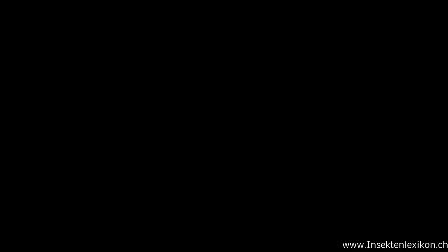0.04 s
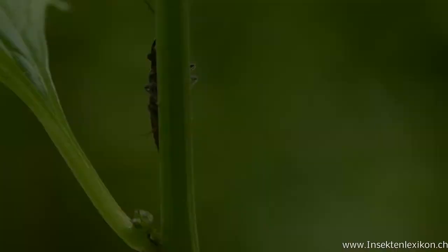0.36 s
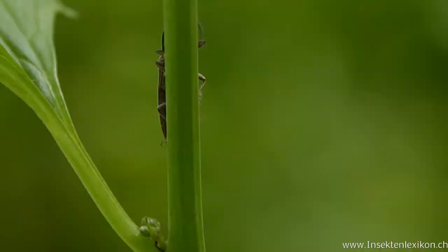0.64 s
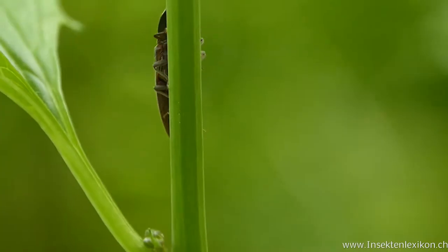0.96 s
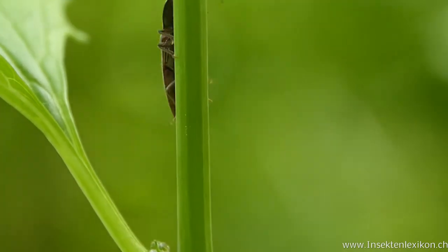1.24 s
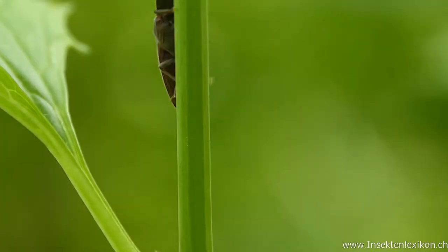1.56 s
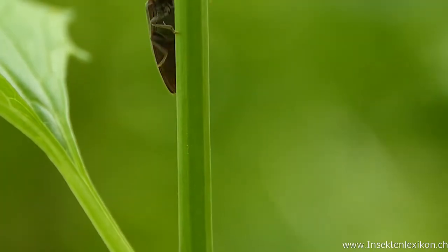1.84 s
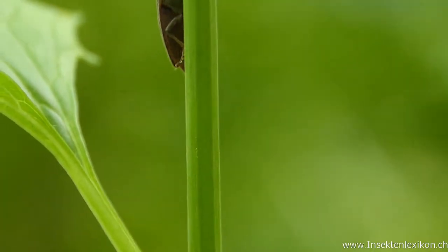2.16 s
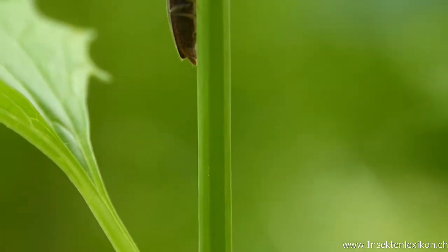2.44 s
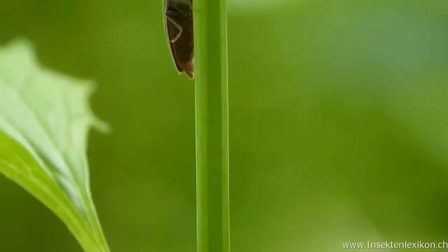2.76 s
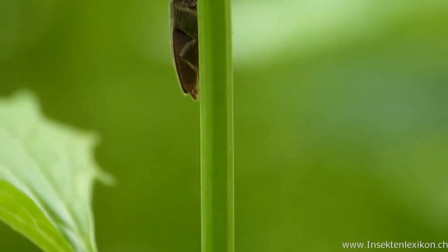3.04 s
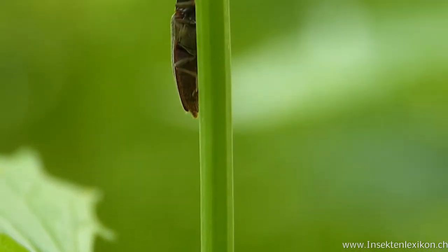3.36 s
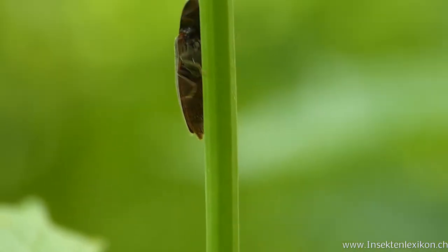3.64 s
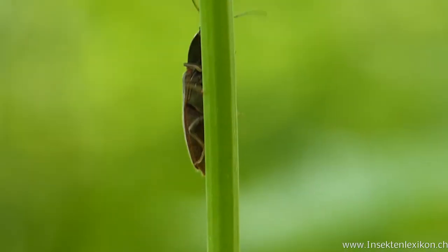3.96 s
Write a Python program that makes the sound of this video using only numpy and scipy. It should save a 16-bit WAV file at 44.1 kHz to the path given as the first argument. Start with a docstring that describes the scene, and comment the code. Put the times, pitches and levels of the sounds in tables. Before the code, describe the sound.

Birdsong fades in at a wood's edge: quick gliding whistles close on the left, mixed with more distant whistles, short high chips and a few buzzy calls. The notes ring briefly among the trees above faint, steady background noise.

```python
"""Songbirds overlap at a wood's edge: a near warbler on the left, a low fluting bird and a thin piping
one further off, sharp falling chips, a few buzzy calls and a faint far chorus. Each note is one
gliding sine; trunks and leaves smear it into a tail. Two small ticks of band-passed noise sound
close by, over a distant rumble and soft hiss. The whole scene fades in."""
import sys
import numpy as np
from scipy import signal
from scipy.fft import rfft, irfft
from scipy.io import wavfile
from scipy.ndimage import uniform_filter1d

SR = 44100
rng = np.random.default_rng(int(sys.argv[2]) if len(sys.argv) > 2 else 0)


def store_pcm(level_fs):
    """Save levels as 16-bit WAV."""
    pcm = np.round(np.clip(level_fs, -1, 1) * 32767).astype(np.int16)
    wavfile.write(sys.argv[1], SR, np.atleast_2d(pcm).T)


N = 176400
T = np.arange(N) / SR
BIN_HZ = np.arange(N // 2 + 1) * SR / N + 1  # +1 Hz avoids zero
WOOD_T60_S = 0.45


def undb(db):
    """Decibels to gain."""
    return 10 ** (np.asarray(db) / 20)


def pan(db):
    """Constant-power gains for a left-minus-right level."""
    gains = undb(np.array([[db], [-db]]) / 2)
    return gains / np.sqrt(np.mean(gains ** 2))


def walk(rate_hz, size):
    """Smooth random wander, spread near 1."""
    hold = max(int(SR / rate_hz), 1)
    steps = np.repeat(rng.standard_normal(N // hold + 2), hold)[:size + hold]
    return uniform_filter1d(steps, hold)[hold:]


def colour(points):
    """Gain per frequency bin from (Hz, dB) points."""
    hz, db = np.array(points, float).T
    return undb(np.interp(np.log(BIN_HZ), np.log(hz), db))


def echo(x, t60_s, build_s=0.006, width=0.43):
    """Dense scatter from trunks and leaves, strongest from ahead."""
    envelope = (1 - np.exp(-T / build_s)) * 1000 ** (-T / t60_s)
    envelope /= np.sqrt(np.sum(envelope ** 2) * (1 + width ** 2))
    mid, side = rng.standard_normal((2, N)) * envelope
    response = np.array([mid + width * side, mid - width * side])
    return signal.fftconvolve(x[None], response, axes=1)[:, :N]


def wood(x, pan_db, echo_db, t60_s):
    """Panned direct sound plus its echo, which sits nearer the centre."""
    return x * pan(pan_db) + undb(echo_db) * echo(x, t60_s) * pan(0.23 * pan_db)


def add_note(out, start_s, hz, db, waver, attack_s, release_s=.0064, flutter_db=2.8):
    """Add a sine along a pitch curve; pitch wavers by a fraction, level flutters."""
    n = len(hz)
    t = T[:n]
    rise = np.sin(np.pi / 2 * np.clip(t / attack_s, 0, 1))
    fall = np.sin(np.pi / 2 * np.clip((t[-1] - t) / release_s, 0, 1))
    phase = 2 * np.pi * np.cumsum(hz * (1 + waver * walk(300, n))) / SR
    gain = undb(db + flutter_db * walk(100, n))
    note = np.sqrt(2) * np.sin(phase) * rise * fall * gain
    i = int(start_s * SR)
    out[i:i + n] += note[:N - i]


def whistles(notes, waver, buzz_depth=0, buzz_hz=170, swell_share=0, min_attack_s=.011):
    """Notes that each arc through three pitches; a buzz shakes the pitch quickly."""
    out = np.zeros(N)
    for start_s, length_s, first_hz, middle_hz, last_hz, db in notes:
        t = np.arange(-min_attack_s / 2, length_s, 1 / SR)
        parabola = np.polyfit([0, .5, 1], [first_hz, middle_hz, last_hz], 2)
        arc_hz = np.polyval(parabola, t / length_s)
        buzz = 1 + buzz_depth * np.sin(2 * np.pi * buzz_hz * t)
        attack_s = max(min_attack_s, swell_share * length_s)
        add_note(out, max(start_s + t[0], 0), arc_hz * buzz, db, waver, attack_s)
    return out


def air(level_db=-51, wander_db=.6):
    """Distant rumble and soft hiss: wide, nearly steady, leaning left."""
    # Noise spectra. Each row: frequency in Hz, relative density in dB.
    mid_spectrum = [(25, -88), (50, -87), (80, -80.5), (115, -68), (165, -68), (250, -72.5), (380, -77.5),
                    (650, -75), (1000, -72.5), (1250, -75.5), (1600, -81), (2800, -79.5), (5000, -83.5),
                    (7500, -85), (10000, -94.5), (13000, -106), (15500, -111)]
    side_spectrum = [(25, -96), (60, -84), (110, -88), (170, -82), (250, -72.5), (380, -74), (650, -75),
                     (1000, -74.5), (1600, -83), (4000, -90.5), (6000, -94), (8000, -91), (10000, -99),
                     (12500, -112), (15500, -120)]
    # Balance. Each row: frequency in Hz, left minus right in dB.
    balance = [(90, 0), (150, 6), (270, 3.5), (550, -2.5), (1100, 2), (3000, -0.5), (7000, 1),
               (15000, -0.5)]
    mid = rfft(rng.standard_normal(N)) * colour(mid_spectrum)
    side = rfft(rng.standard_normal(N)) * colour(side_spectrum)
    lean = np.sqrt(colour(balance))
    stereo = irfft(np.array([(mid + side) * lean, (mid - side) / lean]), N)
    return stereo / stereo.std() * undb(level_db + wander_db * walk(5.25, N))


def chorus(count=56, low_hz=2019, high_hz=5420, length_s=0.052, max_bend=0.1237, db=-62):
    """Faint random notes of far birds, heard only as echo."""
    notes = []
    for slot, (offset, pitch, glide) in enumerate(rng.random((count, 3))):
        start_s = (slot + offset) / count * T[-1]
        hz = low_hz * (high_hz / low_hz) ** pitch
        bend = max_bend * (2 * glide - 1)
        notes.append((start_s, length_s, hz * (1 + bend), hz, hz * (1 - bend), db))
    return echo(whistles(notes, waver=.032), WOOD_T60_S) * pan(db=13)


def ticks(rise_s=0.01, top_hz=10500):
    """Brief close cracks of resonant noise that echo among the trees."""
    # Each row: peak time in s, level in dB, centre and width in Hz, decay in s, echo in dB.
    cracks = [(0.542, -41.5, 4160, 3850, 0.0067, -1.5), (1.618, -49, 5900, 1390, 0.004, -6)]
    lowpass = 1 / (1 + (BIN_HZ / top_hz) ** 10)
    out = np.zeros((2, N))
    for peak_s, db, hz, width_hz, decay_s, echo_db in cracks:
        resonance = 1 / (1 + 1j * (BIN_HZ / hz - hz / BIN_HZ) * hz / width_hz)
        noise = irfft(rfft(rng.standard_normal(N)) * resonance * lowpass, N)
        envelope = np.exp(-np.maximum((peak_s - T) / rise_s, (T - peak_s) / decay_s))
        crack = noise / noise.std() * envelope * undb(db)
        out += wood(crack, pan_db=9.5, echo_db=echo_db, t60_s=WOOD_T60_S)
    return out


def buzzes():
    """Swelling calls roughened by fast vibrato, the first a high down-slur."""
    # Each row: start and length in s, first, middle and last pitch in Hz, level in dB.
    notes = [(.685, 0.18, 9300, 7260, 5080, -60.5), (1.278, .06, 5160, 5050, 5160, -55.5),
             (2.735, 0.068, 4600, 4510, 4270, -55.5), (3.04, 0.038, 5680, 5430, 5130, -56.5),
             (3.605, 0.048, 5900, 5450, 5190, -56.5)]
    calls = whistles(notes, waver=.032, buzz_depth=.032, swell_share=.55)
    return wood(calls, pan_db=1, echo_db=0.87, t60_s=1)


def chips():
    """Sharp calls near the centre; each plunges in pitch and levels out."""
    # Each row: start and length in s, top and settling pitch in Hz, fall constant in s, level in dB.
    notes = [(0.71, 0.012, 5380, 4600, 0.0076, -48), (2.04, 0.036, 5750, 3360, 0.021, -56),
             (2.308, 0.021, 5770, 4450, .013, -57.5), (2.356, 0.079, 5950, 3950, 0.0086, -53.5),
             (2.386, 0.022, 5600, 4490, 0.0155, -53), (2.69, 0.015, 5790, 4460, 0.0061, -48.5),
             (3.023, 0.019, 6160, 4440, 0.0112, -49), (3.034, 0.046, 5960, 3410, 0.019, -54.5),
             (3.374, 0.036, 5800, 3905, 0.0068, -52), (3.691, 0.025, 6160, 4540, .006, -52)]
    calls = np.zeros(N)
    for start_s, length_s, top_hz, settle_hz, fall_s, db in notes:
        t = T[:int(length_s * SR)]
        hz = settle_hz + (top_hz - settle_hz) * np.exp(-t / fall_s)
        add_note(calls, start_s, hz, db, waver=.016, attack_s=.008)
    return wood(calls, pan_db=1, echo_db=2.5, t60_s=0.89)


def piper():
    """Thin, high, fairly level whistles from further off."""
    # Each row: start and length in s, first, middle and last pitch in Hz, level in dB.
    notes = [(.33, .06, 4890, 4960, 5130, -55.5), (.645, 0.073, 3900, 4110, 4150, -59.5),
             (1.304, 0.12, 4090, 4060, 3980, -53.5), (1.505, 0.062, 4880, 4450, 4170, -50.5),
             (1.548, 0.078, 4190, 4182, 4150, -48), (1.645, .07, 4180, 4080, 4180, -61.5),
             (3.43, 0.063, 4080, 4010, 3745, -56), (3.507, 0.0582, 4100, 3920, 3720, -50.5),
             (3.737, 0.047, 4560, 4480, 4500, -54.5), (3.82, 0.12, 4600, 4720, 4950, -60)]
    return wood(whistles(notes, waver=.008), pan_db=10.5, echo_db=0.86, t60_s=0.81)


def fluter():
    """Low slurred whistles from further off, more echo than direct sound."""
    # Each row: start and length in s, first, middle and last pitch in Hz, level in dB.
    notes = [(1.375, 0.16, 2610, 2156, 1660, -59.5), (1.538, 0.12, 2370, 2122, 1975, -56.5),
             (1.772, 0.029, 1837, 2200, 2400, -53.5), (1.81, 0.14, 1717, 1845, 1945, -59),
             (2.008, 0.027, 2670, 2285, 2030, -55), (2.07, .04, 2152, 2100, 1920, -55.5),
             (2.22, 0.081, 2170, 2270, 2300, -58), (2.322, 0.056, 2303, 2330, 2556, -50),
             (2.66, 0.059, 2026, 1928, 1620, -60), (2.94, 0.053, 2704, 2330, 1820, -61),
             (2.995, 0.18, 1933, 1958, 1900, -56.5), (3.85, 0.049, 2390, 2480, 2620, -58),
             (3.908, 0.072, 2980, 2580, 2280, -62.5)]
    return wood(whistles(notes, waver=.016), pan_db=13, echo_db=1.7, t60_s=0.93)


def warbler():
    """Quick gliding whistles near on the left, more direct sound than echo."""
    # Each row: start and length in s, first, middle and last pitch in Hz, level in dB.
    notes = [(.122, 0.067, 3400, 3330, 3800, -50), (.4, .05, 4200, 3270, 2600, -56),
             (.718, 0.019, 2495, 2870, 3180, -64), (.825, 0.11, 2422, 2770, 2863, -56),
             (.88, 0.041, 2750, 2860, 2980, -50), (.945, 0.035, 3200, 3630, 3800, -50.5),
             (1.003, 0.028, 3810, 3560, 3060, -47), (1.125, 0.033, 3235, 2950, 3040, -53.5),
             (1.168, 0.039, 3470, 3030, 2830, -53), (1.178, 0.049, 3165, 3280, 3000, -51.5),
             (1.31, 0.043, 2510, 2750, 3200, -54), (1.33, 0.031, 3176, 3370, 3540, -49.5),
             (1.388, 0.032, 3065, 3400, 3630, -46), (1.42, 0.098, 3790, 3700, 3720, -51),
             (1.735, 0.15, 2680, 2850, 2550, -53), (1.824, 0.051, 3360, 3100, 2860, -49.5),
             (1.985, 0.066, 2700, 2690, 2640, -54.5), (2.045, 0.064, 3130, 3040, 2850, -49.5),
             (2.177, .06, 3370, 3250, 3170, -45.5), (2.25, 0.062, 3230, 3210, 3170, -51),
             (2.396, 0.02, 2850, 2760, 2680, -49.5), (2.485, 0.041, 2710, 2740, 2595, -53.5),
             (2.655, 0.03, 3325, 3420, 3310, -50.5), (2.76, 0.048, 3990, 3925, 3640, -51.5),
             (2.99, .07, 3750, 3510, 3265, -57), (3.067, 0.067, 3280, 3105, 2870, -55),
             (3.325, 0.047, 3600, 3720, 3510, -57), (3.378, 0.034, 3480, 3190, 3040, -48),
             (3.57, 0.043, 3700, 3290, 3240, -46)]
    return wood(whistles(notes, waver=.014), pan_db=11.3, echo_db=-1.55, t60_s=.72)


def scene():
    """Birds, ticks and background in stereo."""
    birds = warbler() + fluter() + piper() + chips() + buzzes()
    return birds + chorus() + ticks() + air()


def record(dry, fade_start_s=0.073, fade_s=0.7, top_hz=15700):
    """Linear fade-in, then a steep low-pass."""
    fade = np.clip((T - fade_start_s) / fade_s, 0, 1)
    lowpass = signal.ellip(10, .1, 70, top_hz, fs=SR, output="sos")
    return signal.sosfilt(lowpass, dry * fade)


dry = scene()
out = record(dry)
store_pcm(out)
```